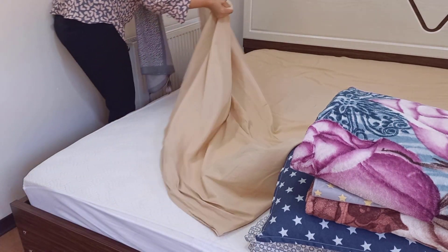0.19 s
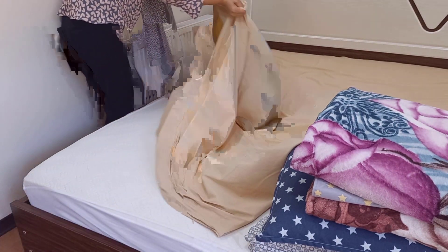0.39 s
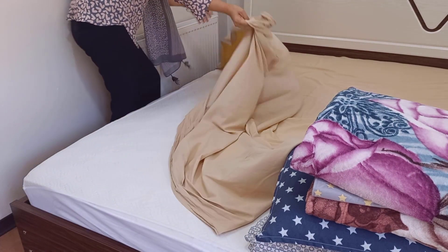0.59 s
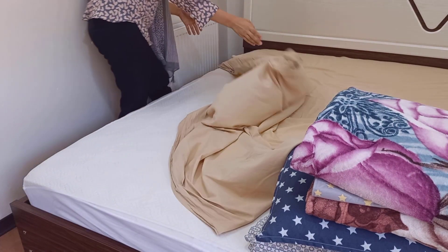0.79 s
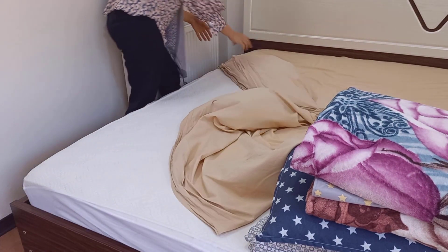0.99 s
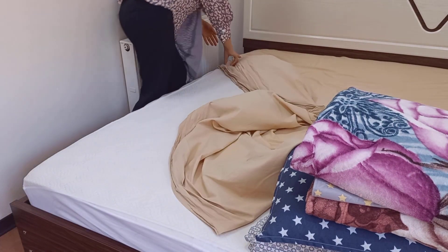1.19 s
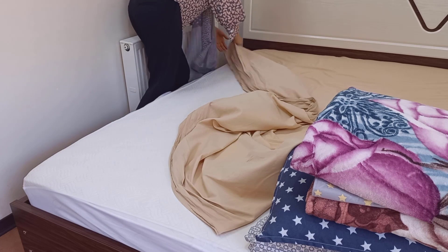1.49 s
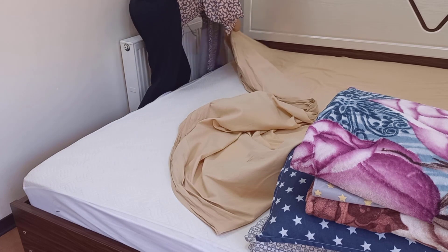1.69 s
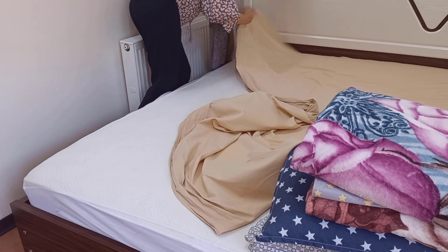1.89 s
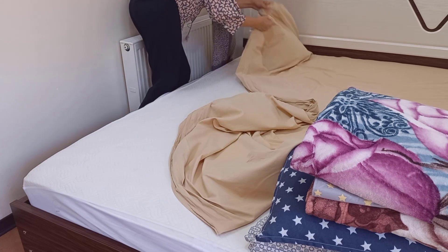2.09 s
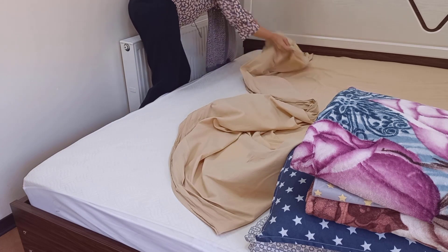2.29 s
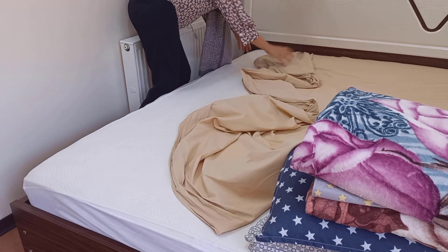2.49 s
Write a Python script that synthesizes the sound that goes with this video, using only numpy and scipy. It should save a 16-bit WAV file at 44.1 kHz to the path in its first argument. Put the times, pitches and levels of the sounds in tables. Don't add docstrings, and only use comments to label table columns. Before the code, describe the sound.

Cotton fabric rustles briskly, two deep footfalls thump through the bedroom floor and distort, then the cloth slides, flicks and settles with softer thuds over a dull low hum, heard from a short way off.

```python
import sys
import numpy as np
from scipy import signal
from scipy.io import wavfile

SR = 44100
rng = np.random.default_rng(int(sys.argv[2]) if len(sys.argv) > 2 else 0)


def transcribe(u):
    v = np.clip(np.atleast_2d(u).T, -1, 1)
    q = np.round(v * 32767).astype(np.int16)
    wavfile.write(sys.argv[1], SR, q)


def convert_level_to_amplitude(level_db):
    exponent = np.asarray(level_db, float) / 20
    return 10 ** exponent


N = 114660

# pitch_hz, likeness (0 to 1)
LIKENESS = [(60, 0.78), (250, 0.87), (500, 0.26), (1000, 0.1), (4000, 0.067), (12000, 0.067)]


def rms_one(x):
    return x / np.sqrt(np.mean(x ** 2) + 1e-20)


def at_hz(points, hz):
    table_hz, values = np.array(points).T
    return np.interp(np.log(hz), np.log(table_hz), values)


def drift(rate_hz):
    pole = np.exp(-80 * np.pi * rate_hz / SR)
    noise = rng.standard_normal(N // 40 + 2002)
    slow = signal.lfilter([1], [1, -2 * pole, pole * pole], noise)[2000:]
    return np.interp(np.arange(N) / 40, np.arange(len(slow)), rms_one(slow))


def swell(start_s, rise_s, fall_s):
    t = np.maximum(np.arange(N) / SR - start_s, 0)
    return (1 - np.exp(-t / rise_s)) * np.exp(-t / fall_s)


def spread(mid, side, hz):
    alike = np.clip(at_hz(LIKENESS, hz), 0, 1)
    return np.sqrt(1 + alike) * mid + np.sqrt(1 - alike) * side * [[1], [-1]]


def fibre_noise(grainy):
    fibres_per_s, size_spread_db = 5000, 7.5
    white = rng.standard_normal((2, 2, N))
    sizes = convert_level_to_amplitude(size_spread_db * np.minimum(rng.exponential(1, white.shape), 5))
    catches = sizes * (rng.random(white.shape) < fibres_per_s / SR) * np.sign(white)
    share = np.clip(grainy, 0, 1)
    return np.sqrt(1 - share) * white + np.sqrt(share) * rms_one(catches)


def bands(spectrum, patchy_db, grainy=0., shape=None):
    edges = 28 * 2 ** (np.arange(29) / 3)
    white = fibre_noise(grainy)
    out, power, together = 0, 0, drift(6.3)
    for k, (low, high) in enumerate(zip(edges, edges[1:])):
        hz = np.sqrt(low * high)
        outside = max(spectrum[0][0] / hz, hz / spectrum[-1][0], 1)
        level = convert_level_to_amplitude(at_hz(spectrum, hz)) / outside ** 2
        band = signal.butter(2, [low, high], "band", fs=SR, output="sos")
        mid, side = signal.sosfilt(band, white[k % 2])
        flicker = convert_level_to_amplitude(patchy_db * (0.37 * together + drift(24.7)))
        gain = level * flicker * (shape(hz) if shape else 1)
        out = out + gain * spread(mid, side, hz)
        power += level ** 2 * (high - low) * 2 / SR
    return out / np.sqrt(power)


def hum():
    # pitch_hz, level_db (per Hz)
    room_spectrum = [(30, -42), (69, -5), (500, -6), (2100, -15), (2700, -67), (4500, -36), (7000, -26.5),
                     (9500, -38.5), (15500, -38)]
    return convert_level_to_amplitude(-41) * bands(room_spectrum, patchy_db=1.02)


def shifts():
    # start_s, level_db, pitch_hz, t60_s
    thuds = [(1.865, -18, 138.8, 0.28), (1.935, -13, 146, 0.22), (1.971, -21.5, 98, 0.29),
             (2.06, -23, 105.6, 0.36), (2.384, -28.5, 135, 0.21), (2.42, -32, 211.4, .3),
             (1.88, -26, 195, 0.3), (1.96, -25, 188.2, 0.38), (2.075, -30, 195, 0.44), (1.92, -27, 68, 0.4),
             (2.42, -32, 101.3, 0.2)]
    t, rise_s = np.arange(N) / SR, 0.0089
    out = np.zeros(N)
    for s, level_db, hz, t60 in thuds:
        out += convert_level_to_amplitude(level_db) * swell(s, rise_s, t60 / np.log(1000)) * np.sin(2 * np.pi * hz * (t - s))
    return out


def steps():
    # start_s, boom_db, wash_db, slap_db, bloom_cycles (the boom's rise)
    footfalls = [
        (.2385, 2, -9, -30, 0.48),
        (.867, -4.5, -9.5, -21, 2),
    ]
    # pitch_hz, first_step_db, second_step_db, t60_s
    modes = [(62.1, -13.5, -12, 0.6), (76.4, -9, -3.5, 0.79), (100.56, -1.5, -9, 0.47),
             (125.2, -4, -14.5, .6), (142.7, -12.5, 8.5, .3), (162.3, -3, -0.5, .5), (195, 4.5, -2, 0.44),
             (235.3, -13.5, -3.5, 0.85), (289, -5.5, -9.5, 0.31), (328.5, -11, -6.5, 0.76),
             (434.8, -15.5, -7.5, 0.31), (501.4, -14, -16, 0.38), (552.5, -14.5, -20, 0.27),
             (632, -12, -17, 0.15)]
    # pitch_hz, level_db (per Hz)
    wash_spectrum = [(24, -49), (40, -34), (64, -3.5), (145, 0), (329, -9), (372, -17.5), (586, -24),
                     (1500, -26.5), (1950, -49), (3300, -120)]
    # pitch_hz, level_db (per Hz)
    slap_spectrum = [(700, -4), (1100, -38), (1600, -3.5), (2100, -2), (2800, -9), (4000, -10),
                     (8000, -22.5), (15500, -34.5)]
    # pitch_hz, t60_s
    room_t60 = [(50, 0.29), (200, 0.51), (1000, 0.52), (4000, 0.53), (12000, 0.53)]
    heel_s, roll_s, settle_s = 0.00331, 0.0089, 0.2
    wash_rise_s, wash_lasts = 0.014, 2.06
    slap_rise_s, slap_cycles = 0.0015, 30

    t, boom = np.arange(N) / SR, np.zeros(N)
    damped = [np.exp(-(np.maximum(t - row[0], 0) / settle_s) ** 2) for row in footfalls]
    for k, (s, boom_db, _, _, bloom) in enumerate(footfalls):
        for m, (hz, *levels_db, t60) in enumerate(modes):
            late = heel_s * (m % 3) / 2
            tone = np.sin(2 * np.pi * hz * (t - s - late))
            ring = swell(s + late, roll_s + bloom / hz, t60 / np.log(1000)) * tone
            boom += convert_level_to_amplitude(boom_db + levels_db[k]) * (-1) ** m * ring * damped[k]

    def fall_s(hz):
        return at_hz(room_t60, hz) / np.log(1000)

    def wash_shape(hz):
        return sum(convert_level_to_amplitude(wash_db) * swell(s, wash_rise_s, wash_lasts * fall_s(hz)) * settling
                   for (s, _, wash_db, _, _), settling in zip(footfalls, damped))

    def slap_shape(hz):
        return sum(convert_level_to_amplitude(slap_db) * swell(s, slap_rise_s + slap_cycles / hz, fall_s(hz))
                   for s, _, _, slap_db, _ in footfalls)

    wash = bands(wash_spectrum, patchy_db=1.5, shape=wash_shape)
    slap = bands(slap_spectrum, patchy_db=0.55, shape=slap_shape)
    return boom + wash + slap


def flaps():
    # start_s, level_db, pitch_hz, length_s
    puffs = [(0.042, -30.5, 258, 0.094), (0.758, -42, 297, .06), (1.093, -28, 417, 0.061),
             (1.15, -34.5, 397, 0.092), (1.872, -29, 260, 0.053), (1.934, -23, 237, 0.031),
             (1.996, -34, 338, 0.084), (2.056, -31, 205, 0.046), (2.183, -30, 650, 0.024),
             (2.19, -42, 1390, 0.068), (2.375, -39.5, 1160, .05), (1.2, -40, 186, 0.1),
             (2.17, -53.5, 6700, .1), (2.352, -49.5, 6600, 0.046), (.0, -33.5, 184, 0.063),
             (0.099, -29.5, 3360, 0.073), (2.418, -34.5, 234, 0.03), (2.472, -37.5, 427, 0.065)]
    rise_s, relative_width = 0.017, 0.87
    out = np.zeros((2, N))
    for s, level_db, hz, length_s in puffs:
        r = np.exp(-np.pi * relative_width * hz / SR)
        resonance = [1, -2 * r * np.cos(2 * np.pi * hz / SR), r * r]
        air = rng.standard_normal((2, N))
        for _ in range(2):
            air = signal.lfilter([1, 0, -1], resonance, air)
        puff = rms_one(spread(*air, hz))
        out += convert_level_to_amplitude(level_db + 6.5) * swell(s, rise_s, length_s) * puff
    return out


def sheet():
    # start_s, hiss_db, folds_db (above the hiss), swish_db (above the hiss)
    slide = [(0, -39.5, 1, 6.5), (.16, -33, -3.5, 0.5), (.24, -36.5, 4, 5), (.34, -43.5, 7, 5.5),
             (.45, -59.5, -7, 0.5), (1.0, -59.5, 22.5, -5), (1.1, -52, 7.5, 4.5), (1.28, -61.5, 12.5, 1.5),
             (1.401, -45.5, 5.5, 5), (1.46, -54, 8, 4), (1.562, -43, 3, 6.5), (1.76, -48, 9, 8),
             (1.86, -36, -4.5, 0.5), (1.95, -48, 11.5, 13.5), (2.03, -48.5, 11.5, 6.5),
             (2.1, -60, 14.5, 1.5), (2.25, -54.5, 0, -9), (2.6, -67, 14, -12)]
    # pitch_hz, level_db (per Hz)
    weave_spectrum = [(2350, -19), (4000, -2.5), (4160, -15), (6620, -12.5), (8020, -14), (12900, -2.5),
                      (15500, -22)]
    # pitch_hz, level_db (per Hz)
    folds_spectrum = [(35, -31), (60, -4.5), (290, -5.5), (323, -6.5), (395, -2), (477, 2), (532, -4),
                      (1500, -5), (1950, -42), (3300, -120)]
    # pitch_hz, level_db (per Hz)
    swish_spectrum = [(1200, -21), (1600, -1), (2200, 0.5), (3600, -6), (5000, -7), (7000, -9.5)]
    s, *columns = np.transpose(slide)
    hiss_db, weight_db, swish_db = [np.interp(np.arange(N) / SR, s, c) for c in columns]
    weave = convert_level_to_amplitude(-0.5) * bands(weave_spectrum, patchy_db=-2.26, grainy=0.38)
    folds = convert_level_to_amplitude(1 + weight_db) * bands(folds_spectrum, patchy_db=4.0, grainy=0.58)
    swish = convert_level_to_amplitude(1.5 + swish_db) * bands(swish_spectrum, patchy_db=1.4, grainy=0.1)
    return convert_level_to_amplitude(hiss_db) * (weave + folds + swish)


def scene():
    sheet_left_db, step_left_db, left_db = 0.34, 0.4, 0.66
    left_lag_s = 0.00032
    floor = (steps() + shifts()) * convert_level_to_amplitude([[step_left_db], [-step_left_db]])
    near = flaps() + sheet() * convert_level_to_amplitude([[sheet_left_db], [-sheet_left_db]])
    near[0] = np.interp(np.arange(N) - left_lag_s * SR, np.arange(N), near[0])
    return (hum() + floor + near) * convert_level_to_amplitude([[left_db], [-left_db]])


def top_cut(x):
    return signal.sosfilt(signal.butter(12, 15610, fs=SR, output="sos"), x)


def record(dry):
    drive_db, ceiling, hardness, lopsided = 0.76, 0.96, 18, 0.043
    x = dry * convert_level_to_amplitude(drive_db) / ceiling
    x = x / (1 + np.abs(x) ** hardness) ** (1 / hardness)
    mix = ceiling * (x - lopsided * x ** 2)
    return top_cut(mix)


dry = scene()
out = record(dry)
transcribe(out)
```